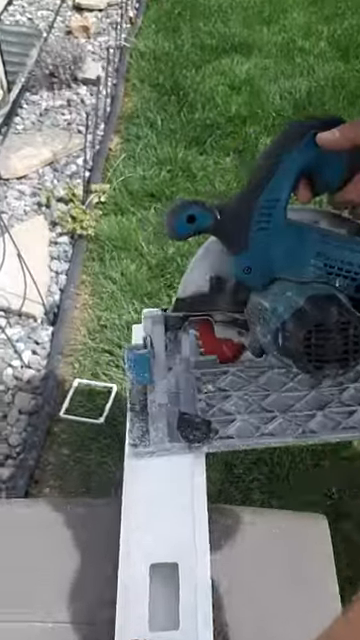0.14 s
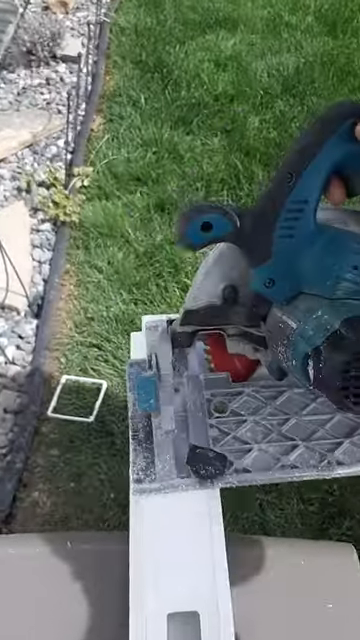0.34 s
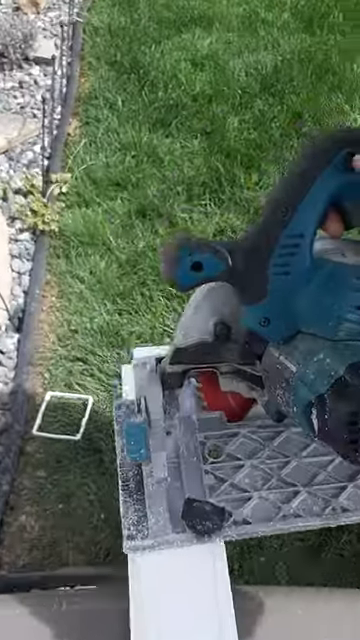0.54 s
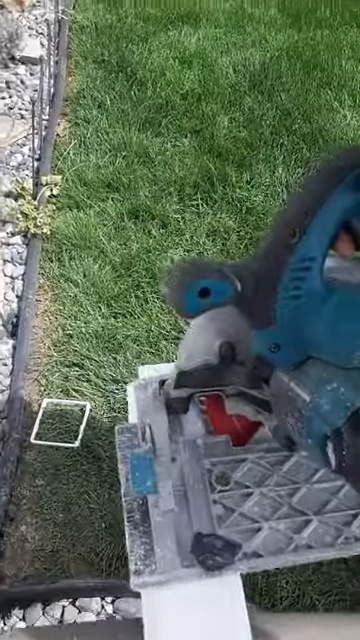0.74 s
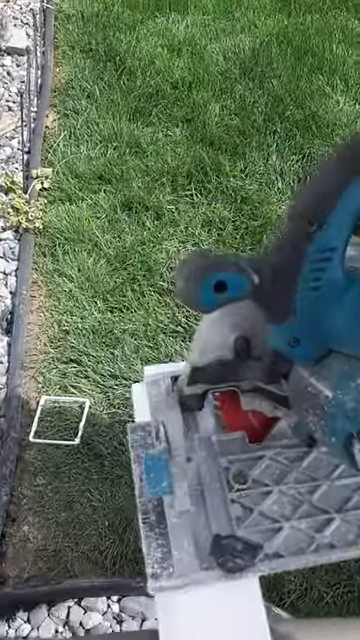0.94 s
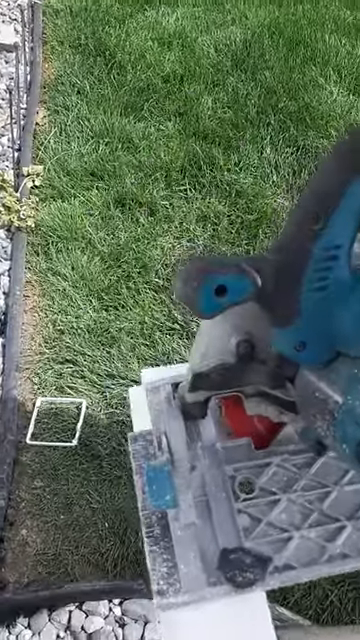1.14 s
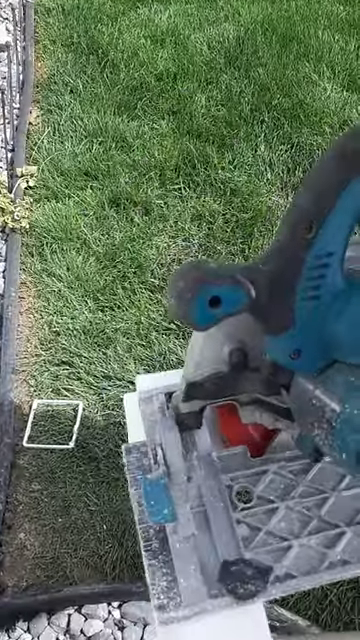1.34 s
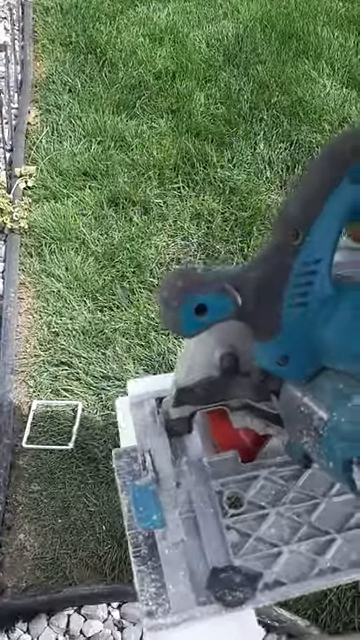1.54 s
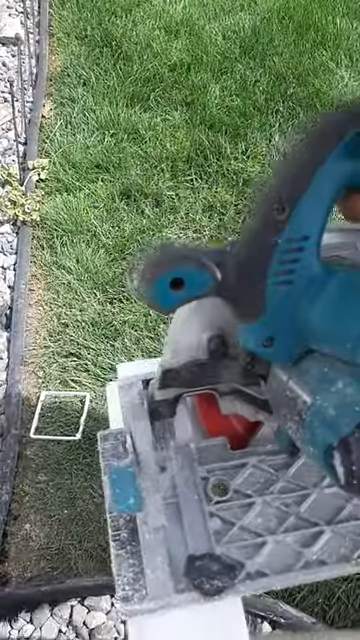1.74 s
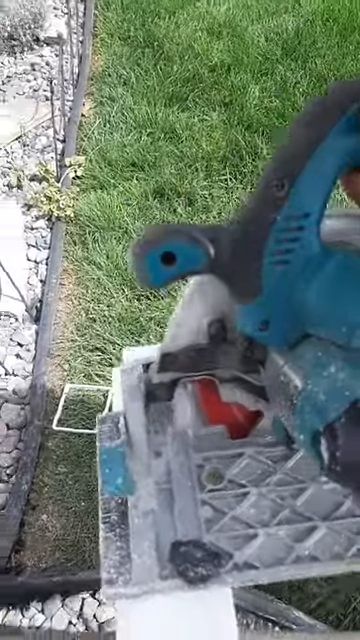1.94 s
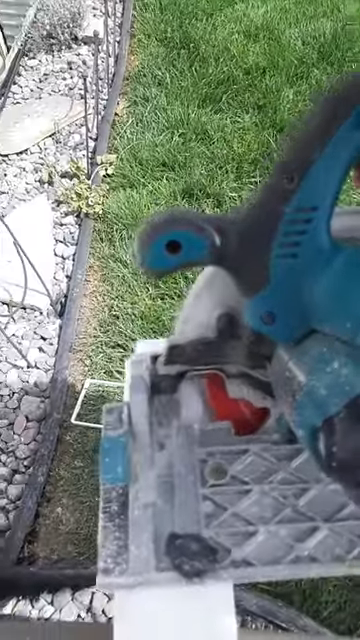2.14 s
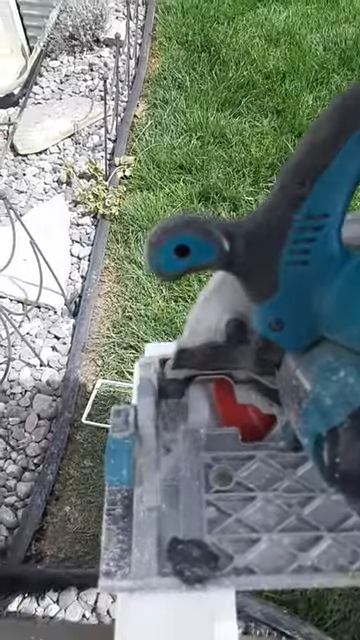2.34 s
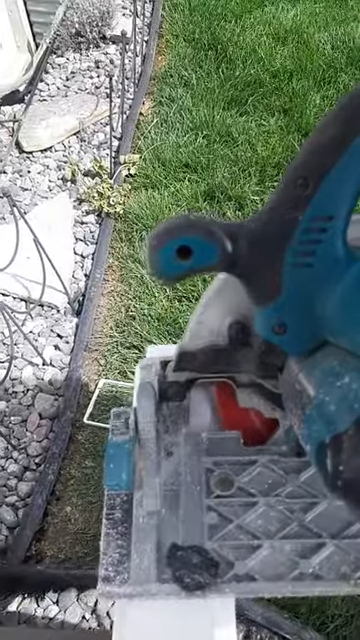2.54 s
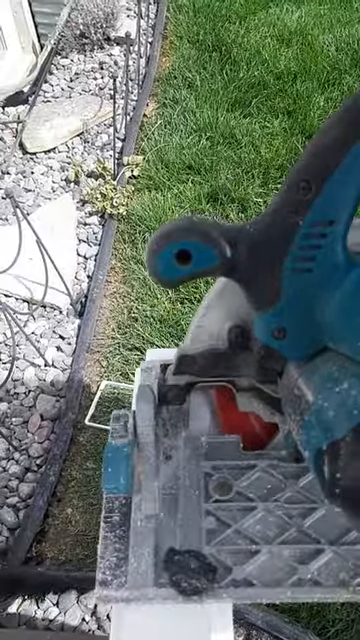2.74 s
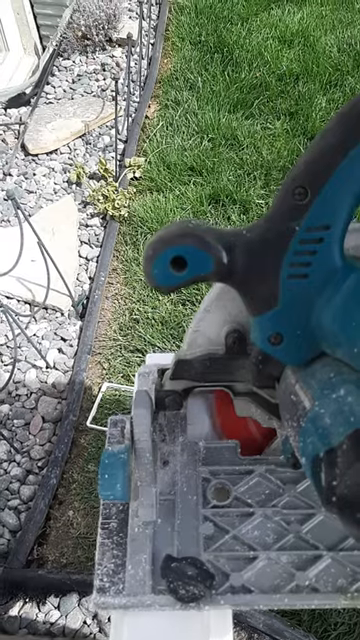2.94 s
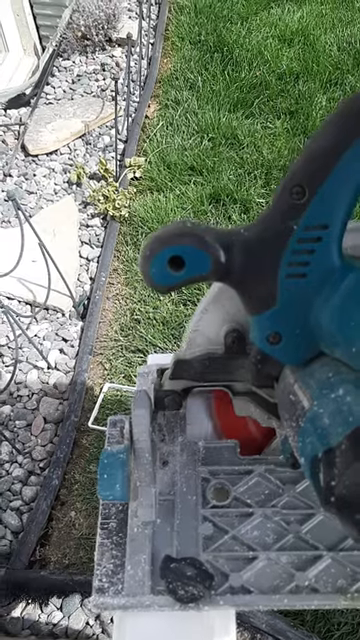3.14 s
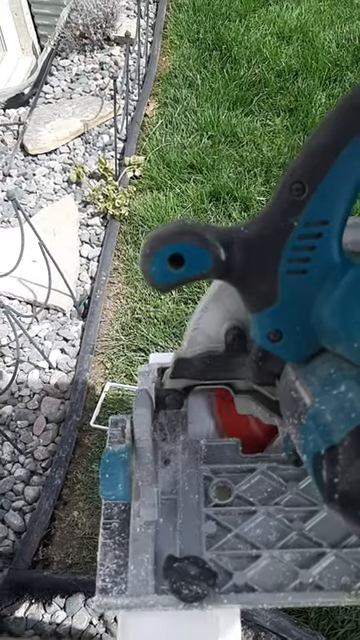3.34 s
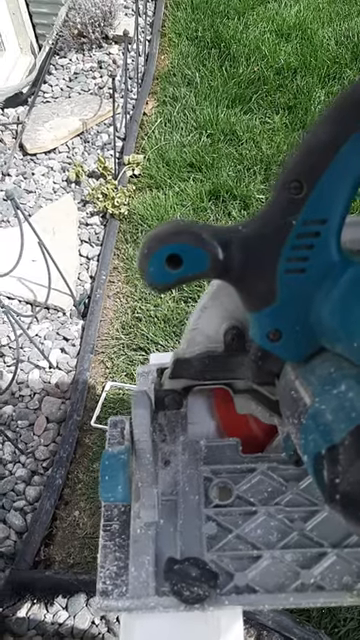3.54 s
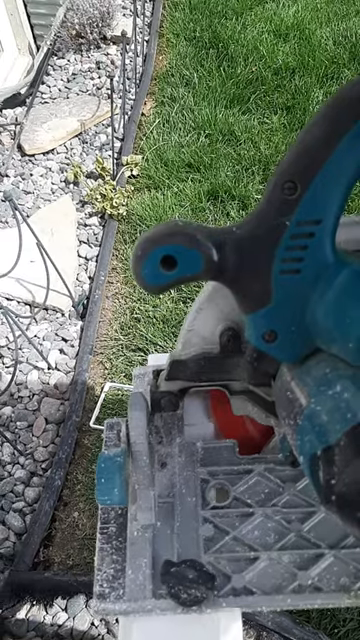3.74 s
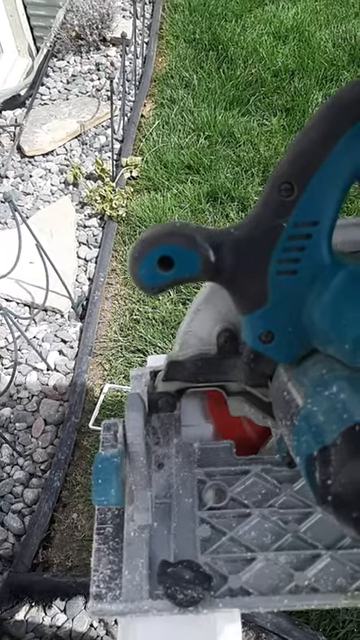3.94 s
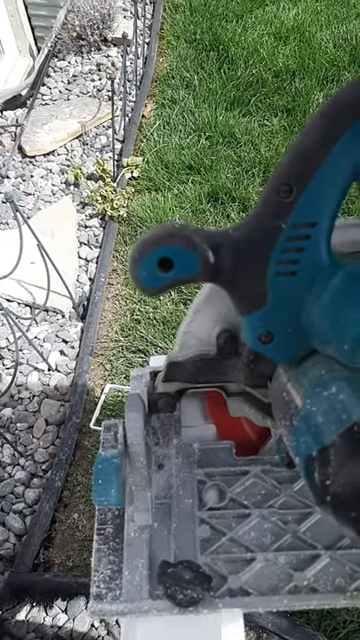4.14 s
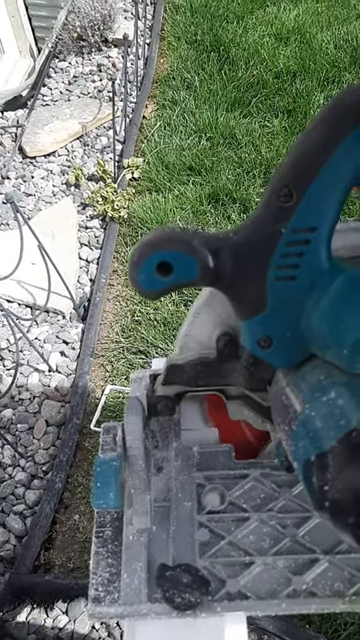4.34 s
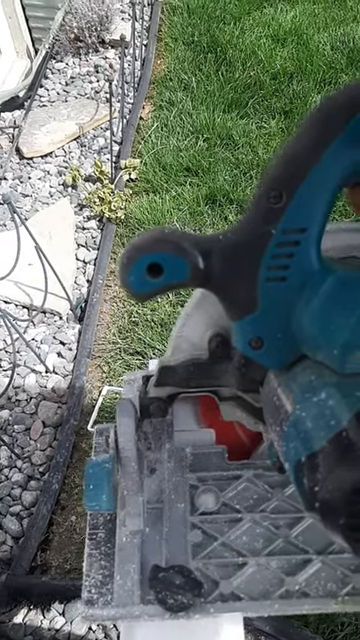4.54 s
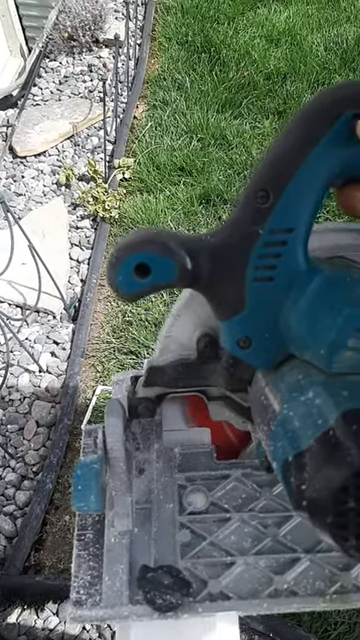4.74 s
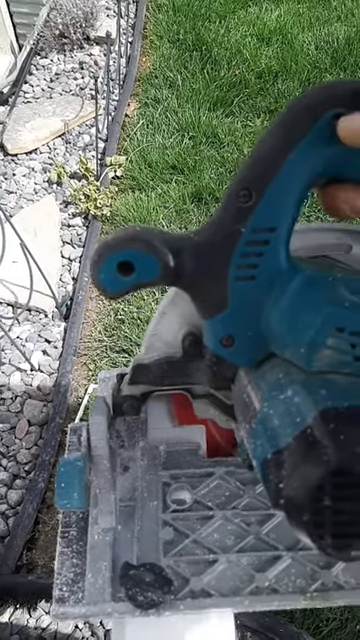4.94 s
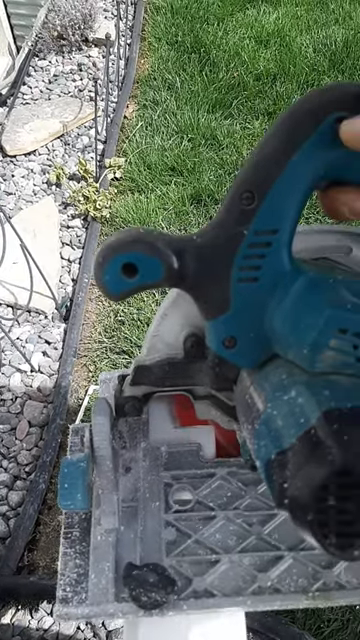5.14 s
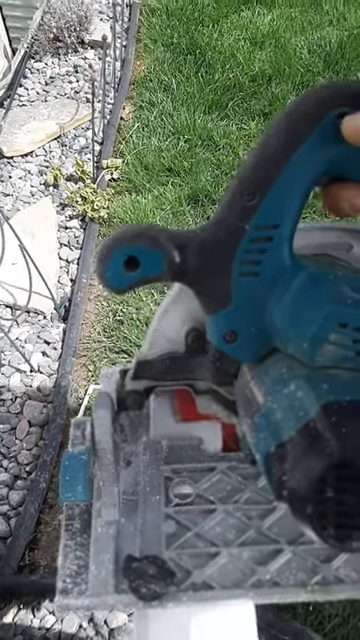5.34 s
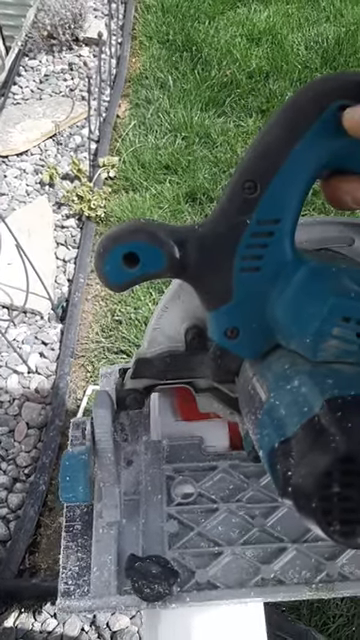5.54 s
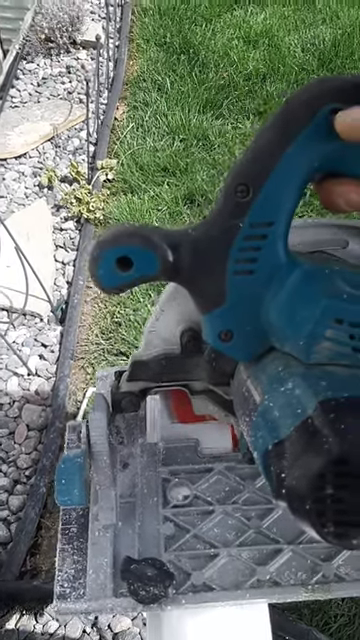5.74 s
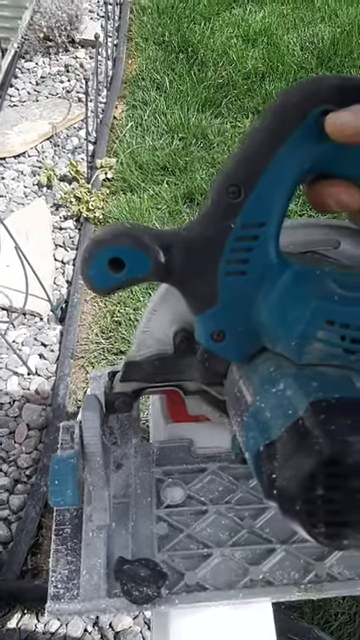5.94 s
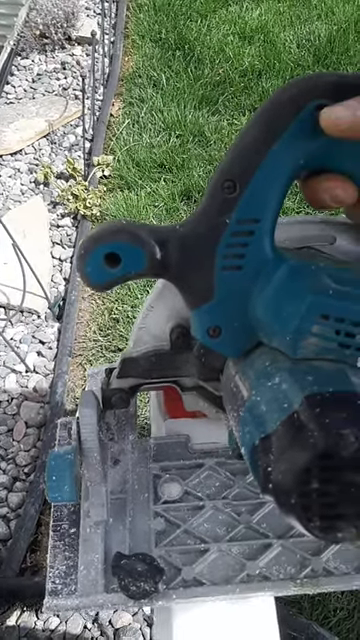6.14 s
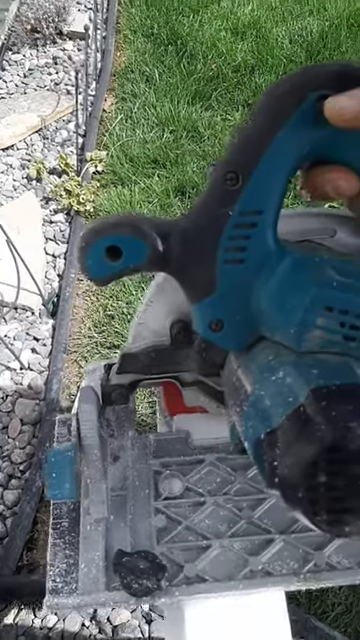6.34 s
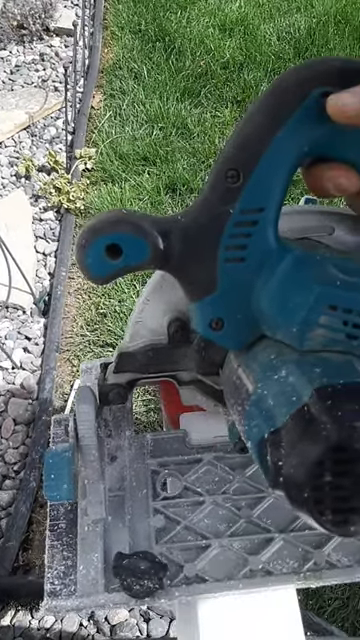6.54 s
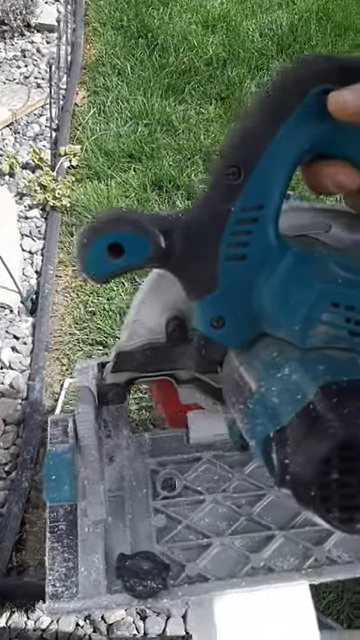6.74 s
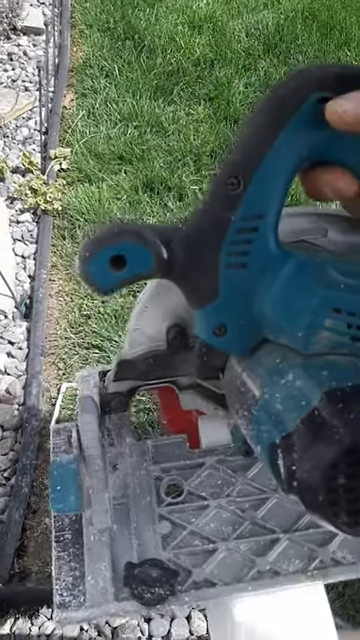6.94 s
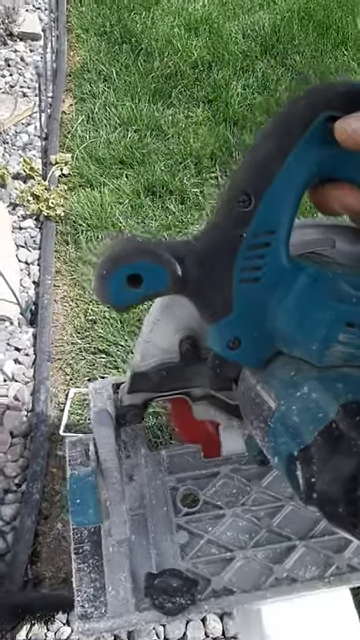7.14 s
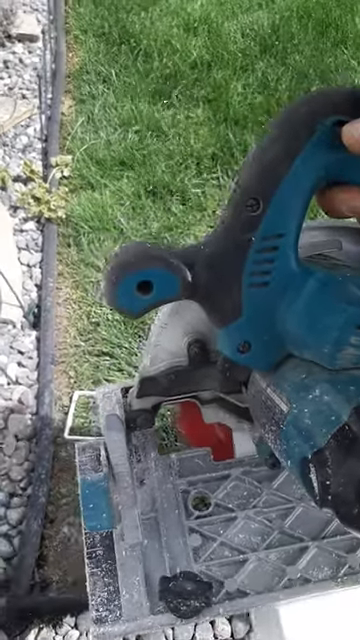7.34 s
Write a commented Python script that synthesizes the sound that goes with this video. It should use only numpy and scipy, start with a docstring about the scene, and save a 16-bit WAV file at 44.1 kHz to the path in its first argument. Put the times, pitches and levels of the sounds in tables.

```python
"""In a quiet garden a handheld circular saw is set on a hollow plastic rail: rumble, bumps, clacks, a squeal.
At 1.1 s it soft-starts with a buzz; one shaft speed drives fan rush, fan tones, gear whine and the blade.
It idles, slack gears knocking. From 3 s the teeth chip the rail and sing at the tooth rate as the speed
sags. Near 4 s the fan's draught brushes the left port of a microphone held close by. From 6.3 s the
nearly severed end shudders."""
import sys
import numpy as np
from scipy import signal
from scipy.fft import rfft, irfft, next_fast_len
from scipy.io import wavfile
from scipy.ndimage import uniform_filter1d, map_coordinates

SR = 44100
rng = np.random.default_rng(int(sys.argv[2]) if len(sys.argv) > 2 else 0)


def put_to_file(sound):
    """Save the sound as 16-bit audio at rate SR, in the file named by the first command-line argument."""
    columns = np.atleast_2d(sound).T  # one column per channel
    safe = np.clip(columns, -1, 1)
    whole_steps = np.round(safe * 32767)
    wavfile.write(sys.argv[1], SR, whole_steps.astype(np.int16))


N = 329991
TIME_S = np.arange(N) / SR
BINS_HZ = np.arange(N // 2 + 1) * SR / N

START_S, CONTACT_S = 1.135, 3.012
FREE_SHAFT_HZ, CHOPPER_HZ, TOP_HZ = 444.5, 1009, 15800
GEAR_RATIO, BLADE_TEETH, PINION_TEETH, FAN_BLADES = 49 / 8, 60, 8, 12
# pan = left minus right; before, after the guard passes the microphone
RAIL_PAN_DB, GUARD_PAN_DB, CHIPS_PAN_DB = (8, 3.5), (21, 1.5), (-2, 0.5)
# motor sounds: level at speed/dB, drop at standstill/dB, shaft rate for full level/Hz, share of MOTOR_DIP
RUSH, HUM = (-14.2, 13, 115, 1), (-24.8, 30, 430, 1)
MESH, WHISTLE = (-23.5, 9, 150, .68), (-31, 30, 350, .85)

# garden air: f/Hz, gain/dB
GARDEN_SPECTRUM = [(24, -32), (40, -12), (249, 0), (363, -5), (542, -8), (1020, -1.5), (1090, -9),
                   (1240, -5.5), (6330, -17.5), (7540, -30), (16000, -47)]
# low rumble at the port: f/Hz, gain/dB
RUMBLE_SPECTRUM = [(20, -30), (40, -13), (70, -7.5), (130, 1.5), (210, 4), (300, -0.5), (450, -1.5),
                   (900, -6), (2000, -14), (5000, -32.5)]
# handling rumble, then from 3.5 s gusts of the fan's draught: t/s, width/s, level/dB
RUMBLE_SWELLS = [(0.0, 0.021, -34), (.19, 0.1, -48), (.4, 0.025, -50), (.95, 0.37, -49.5),
                 (1.22, 0.067, -48), (3.56, 0.041, -48), (3.751, 0.11, -37.5), (4.08, 0.16, -31.5),
                 (4.33, 0.19, -25.5), (4.46, 0.03, -59)]
# sliding squeal: t/s, f/Hz, level/dB
SQUEAL = [(0, 1307, -34.5), (.2, 1250, -34), (.28, 1182, -44.5), (.36, 1184, -45), (.51, 1096, -41),
          (.73, 1110, -41), (.81, 1053, -46.5), (.87, 890, -46), (.92, 850, -88)]
# handling bumps: t/s, drive/dB, decay/s
BUMPS = [(.002, -22, 0.0066), (.07, -32.5, 0.011), (.38, -40.5, 0.036), (.458, -34.5, 0.019),
         (.855, -35, 0.015), (.942, -37, 0.0076), (.978, -32.5, 0.028)]
# bump resonances: f/Hz, width/Hz, gain/dB
BUMP_MODES = [(108, 59, 6.5), (171, 30, -1), (543, 420, -14)]
# shoe, guard and trigger clacks: t/s, drive/dB, decay/s
CLACKS = [(.069, -28, 0.011), (.083, -36, 0.027), (.372, -45, 0.0064), (.46, -61, .005),
          (1.062, -26, 0.0037), (1.134, -22, 0.0031), (1.14, -33, .015)]
# clack resonances: f/Hz, width/Hz, gain/dB
CLACK_MODES = [(734, 180, 14.5), (2360, 730, 12), (3250, 220, 9), (3900, 220, -2), (5200, 74, 13),
               (6110, 67, 17.5)]
# shaft speed lost to load: t/s, loss/Hz
SPEED_SAG = [(2.98, 0), (3.5, 8), (3.8, 14), (4.25, 22.5), (4.45, 24), (4.72, 25), (5.0, 19.2),
             (5.36, 16.8), (5.6, 20.5), (5.9, 25), (6.12, 25), (6.3, 30.5), (6.45, 34), (6.63, 35.6),
             (6.9, 27.5), (7.05, 31.2), (7.36, 30.7), (7.48, 27)]
# soft-start buzz: harmonic, gain/dB
CHOPPER_ORDERS = [(1, 1.5), (2, -16), (3, -8)]
# motor sound and faint air flow drop during the cut, then partly return: t/s, gain/dB
MOTOR_DIP = [(1.7, 2.5), (2.3, 0.5), (2.95, 1), (3.2, -2.5), (3.6, -8.5), (4.4, -16), (4.8, -16),
             (5.5, -14.5), (7.2, -9.5)]
# fan rush: f/Hz, gain/dB
FAN_SPECTRUM = [(30, -66), (100, -33), (224, -34), (340, -23), (433, -8), (513, -11), (660, -2.5),
                (900, -0.5), (1130, -6), (1360, 0), (1950, -8.5), (2580, 0), (3600, -1), (4670, -2.5),
                (5400, -4.5), (6500, -4), (7610, -15.5), (9020, -13), (12300, -15), (16000, -6.5)]
# fan and armature tones: multiple of shaft rate, gain/dB
SHAFT_ORDERS = [(1, -13), (2, -5), (3, -7), (5, -8), (6, -4), (8, -7), (9, -7), (10, 2), (11, 0), (13, -6),
                (15, 0), (18, -11), (19, -8), (20, -7.5), (21, -2.5), (25, -8), (26, -5.5), (29, -12),
                (30, -7), (31, -5.5), (33, -13)]
# gear whine: multiple of mesh rate, gain cutting/dB, gain speeding up/dB
MESH_ORDERS = [(1, -.5, 0), (2, -9, 2), (3, -13, 1), (4, -14, -2), (5, -21, -9), (6, -26, -14)]
# housing's radiation of the whine: f/Hz, gain/dB
HOUSING_RESPONSE = [(100, -26), (450, -7), (650, -12), (900, -4), (1150, -12), (1450, -13), (1750, 1),
                    (2030, -10), (2300, 2.5), (2520, -2), (2780, 4.5), (3050, -5), (3380, 3), (3800, -3),
                    (4250, 1.5), (4850, -7), (5400, 2), (5900, 4), (6250, 1), (6410, -8), (6550, 3),
                    (6690, -8), (6810, 1), (7300, -14), (8300, -12), (8900, -4), (9400, -8), (9800, -3),
                    (10300, 1), (10700, -7), (13000, -15)]
# slack gear knocks: t/s, level/dB, rate/Hz
BACKLASH = [(1.55, -100, 60), (1.65, -30, 67), (1.74, -24, 69), (1.88, -24, 72), (1.95, -27.5, 36),
            (2.45, -29, 34), (2.7, -26.5, 42), (2.85, -28, 45), (2.93, -23, 72), (3.01, -22, 72),
            (3.07, -40, 72), (3.2, -100, 72)]
# work of the teeth on each part: t/s, rail/dB, guard/dB, chips/dB
CUT_LEVELS = [(3.0, -53, -18, -20), (3.07, -44, -18, -21.5), (3.18, -31, -21, -24), (3.42, -25.5, -20, -25),
              (3.55, -24.5, -19.5, -22.5), (3.8, -24.5, -18.5, -19.5), (4.02, -26, -21, -21),
              (4.24, -24.5, -18, -18.5), (4.52, -23.5, -20.5, -19.5), (4.71, -24.5, -25, -20),
              (4.79, -27.5, -22, -18), (4.88, -26, -27.5, -18), (5.19, -27.5, -27.5, -18.5),
              (5.3, -30.5, -25, -20.5), (5.7, -28, -24.5, -20.5), (5.95, -24.5, -25, -20),
              (6.13, -25, -25, -24), (6.24, -24, -24.5, -21.5), (6.45, -25, -23, -21),
              (6.57, -24.5, -26, -17.5), (6.66, -23, -21, -20), (6.85, -27.5, -23.5, -17.5),
              (6.96, -23, -25, -19.5), (7.2, -29, -25, -18), (7.31, -34, -32, -29.5),
              (7.41, -29.5, -29, -21), (7.48, -35, -43, -38)]
# hollow rail: f/Hz, gain/dB
RAIL_SPECTRUM = [(30, -70), (100, -39), (200, -15.5), (330, -8.5), (500, -5), (1100, -3.5), (1500, 2),
                 (2050, 1), (2400, -1.5), (2750, 1), (3400, -6), (4500, -31), (8000, -50)]
# blade guard: f/Hz, gain/dB
GUARD_SPECTRUM = [(800, -26), (2200, -22.5), (3400, 1), (4400, 4), (5200, 2.5), (6000, 5), (6700, -1.5),
                  (7500, -6), (10000, -5)]
# breaking chips: f/Hz, gain/dB
CHIPS_SPECTRUM = [(3000, -49), (6500, -9), (7700, -14), (8300, 2.5), (9200, 3), (10300, 0.5), (11500, 1.5),
                  (12300, 2), (13400, 1), (14500, -2.5), (16000, 1)]
# blade in the kerf: t/s, share of full depth
KERF_DEPTH = [(3.0, .3), (3.8, .8), (5.4, 1)]
# weak tooth-pattern tones: multiple of blade rate, gain/dB
PATTERN_ORDERS = [(31, -7), (147, -3), (150, -4), (153, -5)]
# bursts of song at the tooth rate: t/s, length/s, level/dB, pan/dB
SONG_BURSTS = [(3.015, .11, -29, 18), (3.16, 0.08, -24, 17), (3.252, 0.39, -29, 12),
               (3.662, 0.092, -18.5, 3), (3.703, 0.48, -16.5, 12), (4.166, 0.18, -20.5, -4),
               (4.248, 0.3, -17, 9.5), (4.536, 0.2, -15, 10), (4.998, 0.95, -23, 13),
               (5.514, 0.28, -16, 23), (5.85, 0.065, -18.5, 24), (5.966, 0.15, -15, 1),
               (6.023, 0.13, -11.5, 17), (6.138, 0.08, -13.5, 10), (6.253, 0.029, -13.5, 10),
               (6.291, 0.0092, -11, 13), (6.302, 0.061, -10.5, 5), (6.34, 0.092, -16.5, 4),
               (6.415, .05, -20, 3), (6.478, 0.16, -19.5, 4), (6.667, 0.52, -26.5, 4), (6.9, 0.15, -19, 6),
               (7.027, 0.19, -26.5, 12), (7.394, .05, -31, 8)]
# rasp in the song: t/s, roughness (0-1)
SONG_ROUGHNESS = [(5.76, .1), (5.83, .35), (5.92, .3), (6.0, .08), (6.2, .08), (6.28, .25), (6.34, .1),
                  (6.45, .2), (6.58, .18), (6.68, .45), (6.9, .2)]
# screeching tones: multiple of blade rate, resting level/dB, wander/rad, pan/dB, right port lag/rad
SCREECH_ORDERS = [(27, -42, .5, -4, 2.4), (30, -35.5, .85, 1, 1.7), (39, -44, .9, 4, .4),
                  (66, -50, .5, 10, -1.6), (75, -37, .6, 9, -.3), (84, -44, 1.1, 11, 2.5),
                  (87, -44, 1, 14, -2.4), (90, -38, .7, 7, 1.9), (120, -32, .55, 3, -2.1),
                  (124, -45, .8, 3, .6), (150, -35, .7, 2, 1), (165, -46, .8, 2, -1),
                  (180, -36, .8, 0, -.3), (210, -38, .9, 2, -.6)]
# swells as the blade flexes: t/s, multiple of blade rate, level/dB
SCREECHES = [(3.1, 124, -28), (3.52, 30, -31), (3.55, 90, -29), (3.95, 30, -29), (3.66, 84, -25),
             (3.73, 120, -26), (3.93, 84, -24), (4.05, 120, -26), (4.09, 180, -28), (4.17, 84, -24),
             (4.17, 87, -23), (4.27, 87, -21), (4.28, 120, -25), (4.46, 87, -26), (4.5, 27, -25),
             (4.66, 30, -26), (4.83, 120, -26), (4.95, 30, -29), (5.05, 165, -27), (5.14, 30, -28),
             (5.4, 120, -26), (5.4, 165, -30), (5.09, 180, -23), (5.2, 66, -31), (5.2, 124, -23),
             (5.31, 180, -27), (5.42, 210, -24), (5.71, 210, -27), (5.86, 90, -24), (5.97, 75, -26),
             (6.26, 30, -25), (6.4, 30, -26), (6.75, 30, -29), (7.17, 30, -28), (6.07, 30, -27),
             (6.27, 180, -24), (6.3, 210, -23), (6.41, 180, -20), (6.41, 120, -27), (6.51, 210, -27),
             (6.59, 90, -23), (6.59, 120, -24), (6.91, 180, -25), (6.95, 120, -24), (7.11, 120, -22),
             (7.15, 39, -28), (7.19, 120, -23), (7.43, 120, -26), (7.42, 30, -26)]
# ringing of the blade's plate: multiple of blade rate, gain/dB
PLATE_ORDERS = [(123, -1), (129, -2), (144, -2), (156, -2), (159, -2), (173, -3), (177, -3)]
# nearly severed end: t/s, level/dB
SHUDDER = [(5.6, -71), (6.25, -68), (6.42, -26), (6.65, -28), (6.85, -37.5), (7.1, -30.5), (7.25, -44),
           (7.48, -45)]


def undb(db):
    """Decibels to gain."""
    return 10 ** (np.asarray(db) / 20)


def unit(x):
    """Scale to rms 1."""
    return x / np.sqrt(np.mean(x ** 2))


def curves(table):
    """Table columns as signals in time."""
    t_s, *columns = np.transpose(table)
    return [np.interp(TIME_S, t_s, column) for column in columns]


def since(t_s):
    """Seconds since t_s, 0 before."""
    return np.maximum(TIME_S - t_s, 0)


def swell(t_s, width_s):
    """Bell curve round t_s."""
    return np.exp(-((TIME_S - t_s) / width_s) ** 2 / 2)


def noise():
    """Two independent white noises."""
    return rng.standard_normal((2, N))


def walk(rate_hz):
    """Random wander, rms 1."""
    knots = rng.standard_normal(4096)
    return unit(np.interp(TIME_S * rate_hz, np.arange(len(knots)), knots))


def response(hz, spectrum):
    """Gain of an (f/Hz, gain/dB) table at hz."""
    points_hz, db = np.transpose(spectrum)
    return undb(np.interp(np.log(hz + 1), np.log(points_hz), db))


def filtered(x, gain):
    """Apply a response given on BINS_HZ."""
    size = next_fast_len(N + 2000, real=True)
    hz = np.arange(size // 2 + 1) * SR / size
    return irfft(rfft(x, size) * np.interp(hz, BINS_HZ, gain), size)[..., :N]


def colour(x, spectrum):
    """Shape by a spectrum, rms 1."""
    return unit(filtered(x, response(BINS_HZ, spectrum)))


def ports(pair, likeness, scatter_rad=3.4):
    """The right port shares part of the left's sound, phase scattered round saw and hand."""
    scatter = np.interp(BINS_HZ, np.arange(64) * 450, rng.uniform(-1, 1, 64))
    phase_rad = scatter_rad * scatter * np.minimum(BINS_HZ / 900, 1)
    right = likeness * pair[0] + np.sqrt(1 - likeness ** 2) * pair[1]
    return np.array([pair[0], filtered(right, np.exp(1j * phase_rad))])


def place(x, db, pan_db):
    """Set gain and balance."""
    left = 2 / (1 + undb(-pan_db))
    return x * undb(db) * np.array([left, 2 - left]).reshape(2, -1)


def tones(turns, orders, flutter_db, wander_rad, flutter_hz):
    """Multiples of a rotation, fluttering in level and phase, out of step at the ports; rms 1."""
    out = 0
    for k, db in orders:
        angle = 2 * np.pi * np.round(k) * turns + wander_rad * walk(flutter_hz)
        lag_rad = np.array([[0], [rng.uniform(-np.pi, np.pi)]])
        out = out + undb(db + flutter_db * walk(flutter_hz)) * np.sin(angle + lag_rad)
    return unit(out)


def garden():
    """Quiet, wavering outdoor air."""
    air = ports(colour(noise(), GARDEN_SPECTRUM), likeness=0.22)
    return place(air, -47.5 + 1.2 * walk(3.94), pan_db=12.8)


def port_rumble():
    """Low rumble swells at the left port: handling at first, then gusts of the fan's draught."""
    flow = undb(-78.5 + 0.94 * curves(MOTOR_DIP)[0])
    swells = sum(undb(db) * swell(t_s, width_s) for t_s, width_s, db in RUMBLE_SWELLS)
    rumble = ports(colour(noise(), RUMBLE_SPECTRUM), likeness=0.13)
    return place(rumble * (flow + swells), 2.2 * walk(45), pan_db=31)


def squeal():
    """The saw slides into place with a thin falling tone."""
    hz, db = curves(SQUEAL)
    tone = tones(np.cumsum(hz) / SR, [(1, 9), (2, -16)], flutter_db=1, wander_rad=0.26, flutter_hz=40.2)
    return place(tone, db, pan_db=5.2)


def knocks(events, modes):
    """Short contact scrapes ring a set of modes."""
    body = sum(undb(db) / (1 + 1j * (BINS_HZ ** 2 - hz ** 2) / (width_hz * BINS_HZ + 1))
               for hz, width_hz, db in modes)
    push = sum(undb(db) * (TIME_S >= t_s) * np.exp(-since(t_s) / decay_s) for t_s, db, decay_s in events)
    return filtered(ports(noise(), likeness=0.48) * push, body / np.sqrt(np.mean(np.abs(body) ** 2)))


def handling():
    """Soft hands bump without treble; shoe, guard and trigger clack."""
    bumps = filtered(knocks(BUMPS, BUMP_MODES), 1 / (1 + (BINS_HZ / 750) ** 2))
    clacks = knocks(CLACKS, CLACK_MODES)
    return place(bumps, 4.4, pan_db=13) + place(clacks, 0, pan_db=14)


def shaft_speed():
    """Armature rate/Hz: climbs ever faster until full voltage, settles, sags under load."""
    ramp_s, settle_s = .371, .117
    elapsed_s = np.minimum(since(START_S), ramp_s)
    climb_hz = 540 * elapsed_s + 1110 * elapsed_s ** 2
    unloaded_hz = FREE_SHAFT_HZ - (FREE_SHAFT_HZ - climb_hz) * np.exp(-since(START_S + ramp_s) / settle_s)
    return uniform_filter1d(unloaded_hz - curves(SPEED_SAG)[0], size=1400)


def chopper():
    """The soft-start chopper buzzes during the ramp; overtones come first and fade first."""
    attack_s, hold_s, release_s = 0.031, 0.11, 0.092
    buzz = 0
    for k, db in CHOPPER_ORDERS:
        rise = 1 - np.exp(-since(START_S) * k ** 2 / attack_s)
        fall = np.exp(-(since(START_S + hold_s / k ** 2) / release_s) ** 2 / 2)
        tone = tones(CHOPPER_HZ * TIME_S, [(k, 0)], flutter_db=3, wander_rad=0.071, flutter_hz=61)
        buzz = buzz + undb(db) * rise * fall * tone
    return place(buzz, -20.5, pan_db=18)


def motor_db(shaft_hz, sound):
    """A motor sound grows with speed, drops during the cut, then partly returns."""
    db, drop_db, full_hz, share = sound
    return db - drop_db * np.maximum(1 - shaft_hz / full_hz, 0) + share * curves(MOTOR_DIP)[0]


def fan_rush(shaft_hz, turns):
    """Air noise throbs with the shaft; a slow fan has less hiss and low roar."""
    throb = 1 + 0.038 * np.sin(4 * np.pi * turns) + 0.18 * np.sin(8 * np.pi * turns)
    air = colour(noise() * throb * undb(walk(120)), FAN_SPECTRUM)
    air = ports(air, likeness=0.95, scatter_rad=1.9)
    # the saw's body shades the right port
    air[1] = filtered(air[1], response(BINS_HZ, [(400, -15), (1900, -4.5), (2800, -19), (6500, -23),
                                                 (8500, 1), (12000, -4.5), (16000, -12)]))
    lost_hiss = filtered(air, 1 / (1 + (7000 / (BINS_HZ + 1)) ** 6)) * np.interp(shaft_hz, [0, 380], [.85, 0])
    lost_roar = filtered(air, 1 / (1 + (BINS_HZ / 2000) ** 4)) * np.interp(shaft_hz, [320, 400], [.59, 0])
    return (air - lost_hiss - lost_roar) * undb(motor_db(shaft_hz, RUSH))


def shaft_hum(shaft_hz, turns):
    """Fan and armature tones, rougher under load."""
    wander_rad = .15 + .08 * curves(SPEED_SAG)[0]
    hum = tones(turns, SHAFT_ORDERS, flutter_db=1.8, wander_rad=wander_rad, flutter_hz=30)
    return place(hum, motor_db(shaft_hz, HUM), pan_db=14)


def fan_whistle(shaft_hz, turns):
    """Blade-passing tone of the fan, strongest on nearing full speed."""
    peak_s, rise_s, fall_s = 1.79, 0.061, 0.84
    boost_db = 10 * np.exp(-np.abs(TIME_S - peak_s) / np.where(TIME_S < peak_s, rise_s, fall_s))
    whistle = tones(turns, [(FAN_BLADES, 0)], flutter_db=0, wander_rad=0.064, flutter_hz=31.85)
    return place(whistle, motor_db(shaft_hz, WHISTLE) + boost_db, pan_db=14.7)


def gears(shaft_hz, turns):
    """Gears whine while torque holds them in mesh; speeding up, they brighten and rattle once a turn."""
    grip_hz, grip_s, bright_hz_per_s = 25.2, 0.22, 150
    meshed = np.maximum(np.tanh((FREE_SHAFT_HZ - shaft_hz) / grip_hz),
                        np.minimum(since(CONTACT_S) / grip_s, 1))
    load_db = 4.5 * swell(3.4, .22) - 22 * swell(6.87, 0.13)  # first bite; load briefly lets go
    starting = np.clip(np.gradient(shaft_hz) * SR / bright_hz_per_s, 0, 1) * (TIME_S < CONTACT_S)
    rattle_db = starting ** 2 * (2.1 * walk(110) + 3 * np.sin(2 * np.pi * turns) - 1)
    whine = 0
    for k, cutting_db, starting_db in MESH_ORDERS:
        hz = k * PINION_TEETH * shaft_hz
        db = cutting_db + (starting_db - cutting_db) * starting + 1.4 * walk(30)
        radiated = response(hz, HOUSING_RESPONSE) * (hz < TOP_HZ)
        slip_rad = .35 * np.sqrt(k) * starting * walk(220)
        whine = whine + undb(db) * radiated * np.sin(2 * np.pi * k * PINION_TEETH * turns + slip_rad)
    return place(whine * meshed, motor_db(shaft_hz, MESH) + load_db + rattle_db, pan_db=14.6)


def backlash(turns):
    """At idle the slack gears clash every blade turn or two: short bursts near the mesh rate."""
    decay_s, scatter_db, detune_hz = .0012, 1.6, 110
    db, rate_hz = curves(BACKLASH)
    count, part = np.divmod(np.cumsum(rate_hz * (1 + .16 * walk(30))) / SR, 1)
    age_s = part / rate_hz
    size, phase, detune = rng.standard_normal((1024, 3))[count.astype(int)].T
    burst = age_s ** 2 * np.exp(-age_s / decay_s) * undb(scatter_db * size) / np.sqrt(rate_hz)
    cycles = PINION_TEETH * turns + detune_hz * (detune + .5) * age_s + phase
    return place(unit(burst * np.sin(2 * np.pi * cycles)), db, pan_db=14.5)


def bites(blade_turns, repeat, uneven_db, pulsing):
    """Each tooth breaks a chip: edge marks repeat each turn and drift along the kerf; fractures are new."""
    size, chatter_turns, drift_hz = 8192, .0006, 8
    spot = (blade_turns + chatter_turns * walk(40)) % 1
    marks = signal.resample(rng.standard_normal((3, 2, size // 16)), size, axis=2)
    weights = np.array([walk(drift_hz) for _ in marks])
    weights = weights / np.sqrt(np.sum(weights ** 2, axis=0))
    edges = sum(w * mark[:, (spot * size).astype(int)] for w, mark in zip(weights, marks))
    fracture = np.sqrt(repeat) * edges + np.sqrt(1 - repeat) * noise()
    tooth = (spot * BLADE_TEETH).astype(int)
    tooth_db = uneven_db * sum(w * rng.standard_normal(BLADE_TEETH)[tooth] for w in weights)
    pulses = np.exp(pulsing * np.cos(2 * np.pi * BLADE_TEETH * blade_turns))
    return fracture * undb(tooth_db + 1.43 * walk(70)) * pulses


def passing(pan_db):
    """Pan shifts as the guard slides past the microphone."""
    before_db, after_db = pan_db
    pass_s, width_s = 4.7, 0.13
    return before_db + (after_db - before_db) * (1 + np.tanh((TIME_S - pass_s) / width_s)) / 2


def shifting(x):
    """Resonances swell and fade one by one as the kerf advances."""
    depth_db, width_hz, rate_hz = 2.1, 260, 11
    hz, t_s, spectra = signal.stft(x, SR, nperseg=512)
    grid = np.meshgrid(hz / width_hz, t_s * rate_hz, indexing="ij")
    swells = unit(map_coordinates(rng.standard_normal((128, 128)), grid, order=1))
    return signal.istft(spectra * unit(undb(depth_db * swells)), SR)[1][:, :N]


def cut(blade_turns):
    """The teeth shake rail and guard, spray chips and add weak pattern tones."""
    rail_db, guard_db, chips_db = curves(CUT_LEVELS)
    rail = colour(bites(blade_turns, repeat=0.63, uneven_db=2, pulsing=0.99), RAIL_SPECTRUM)
    rail = place(ports(rail, likeness=0.38), rail_db, passing(RAIL_PAN_DB))
    guard = colour(bites(blade_turns, repeat=0.96, uneven_db=0.5, pulsing=0.77), GUARD_SPECTRUM)
    guard = place(ports(guard, likeness=0.052), guard_db, passing(GUARD_PAN_DB))
    chips = colour(bites(blade_turns, repeat=0.56, uneven_db=-2, pulsing=0.26), CHIPS_SPECTRUM)
    chips = place(ports(chips, likeness=0.023), chips_db, passing(CHIPS_PAN_DB))
    pattern = tones(blade_turns, PATTERN_ORDERS, flutter_db=3.5, wander_rad=.75, flutter_hz=70)
    pattern = place(pattern * curves(KERF_DEPTH)[0], chips_db - 11, pan_db=2)
    contact = np.clip((TIME_S - CONTACT_S + 0.011) / 0.0075, 0, 1)
    return contact * (shifting(rail + guard) + chips + pattern)


def song(blade_turns):
    """Tooth-rate whine builds and breaks off, swaying once a turn with the blade's run-out."""
    build_share, release_s, run_out = .12, .009, .2
    strength = place(np.ones(N), -33, pan_db=4)  # between bursts
    for t_s, length_s, db, pan_db in SONG_BURSTS:
        rise = 1 - np.exp(-since(t_s) / (build_share * length_s))
        fall = np.exp(-since(t_s + length_s) / release_s)
        strength = np.maximum(strength, place(rise * fall, db, pan_db))
    rough = curves(SONG_ROUGHNESS)[0]
    angle = 2 * np.pi * BLADE_TEETH * blade_turns + rough * walk(220)
    port_rad = np.array([0.05 * walk(30), 1.07 + 0.24 * walk(30)])
    sway = 1 + run_out * np.sin(2 * np.pi * blade_turns) + rough * walk(200)
    return strength * unit(sway * undb(.6 * walk(40)) * np.sin(angle + port_rad))


def screech(blade_turns):
    """Tooth-pattern overtones catch and slip in the kerf, swelling as the blade flexes."""
    out, depth = 0, curves(KERF_DEPTH)[0]
    for k, rest_db, wander_rad, pan_db, lag_rad in SCREECH_ORDERS:
        strength = depth * undb(rest_db + 4 * walk(9))
        for t_s, order, db in SCREECHES:
            if order == k:
                strength = np.maximum(strength, undb(db) * swell(t_s, width_s=0.054))
        angle = 2 * np.pi * k * blade_turns + wander_rad * walk(90)
        tone = unit(undb(2 * walk(90)) * np.sin(angle - np.array([[0], [lag_rad]])))
        out = out + place(strength * tone, 0, pan_db)
    return out


def plate_ring(blade_turns):
    """The blade's plate rings along with the chip spray, and once briefly at its own pitch."""
    own_hz, chips_db = 3905, curves(CUT_LEVELS)[2]
    driven = tones(blade_turns, PLATE_ORDERS, flutter_db=5, wander_rad=1, flutter_hz=10)
    own = unit(np.sin(2 * np.pi * own_hz * TIME_S)) * swell(6.19, width_s=.03)
    return place(driven, chips_db - 12, passing(CHIPS_PAN_DB)) + place(own, -23, pan_db=10)


def shudder(blade_turns):
    """The teeth shake the nearly severed end."""
    drive = bites(blade_turns, repeat=0.17, uneven_db=8, pulsing=0.35)
    end = colour(drive, [(30, -46), (200, -21), (420, -7.5), (540, 7.5), (800, -8), (1300, -2.5),
                         (3000, -44)])
    return place(ports(end, likeness=0.34), curves(SHUDDER)[0], pan_db=4.1)


def scene():
    """One shaft drives motor sounds and blade; the blade sings once it touches the rail."""
    shaft_hz = shaft_speed()
    turns = np.cumsum(shaft_hz) / SR
    blade_turns = turns / GEAR_RATIO
    blade = song(blade_turns) + screech(blade_turns) + plate_ring(blade_turns)
    blade *= np.minimum(since(CONTACT_S) / 0.017, 1)
    motor = chopper() + fan_rush(shaft_hz, turns) + shaft_hum(shaft_hz, turns)
    motor += fan_whistle(shaft_hz, turns) + gears(shaft_hz, turns)
    saw = motor * (TIME_S >= START_S) + backlash(turns) + cut(blade_turns) + blade + shudder(blade_turns)
    return garden() + port_rumble() + squeal() + handling() + saw


def record(dry):
    """Clip at full scale, low-pass at TOP_HZ."""
    return signal.sosfilt(signal.ellip(12, .1, 70, TOP_HZ, fs=SR, output="sos"), np.clip(dry, -1, 1))


dry = scene()
out = record(dry)
put_to_file(out)
```